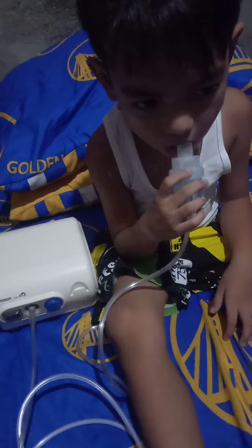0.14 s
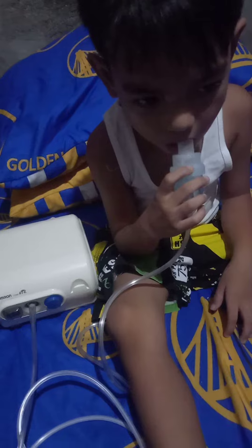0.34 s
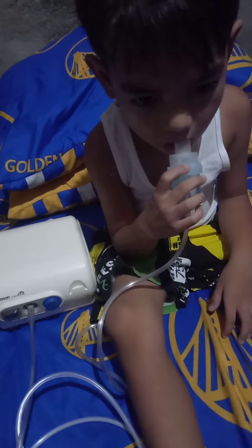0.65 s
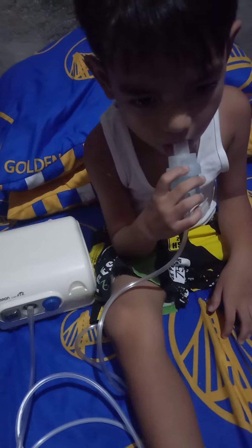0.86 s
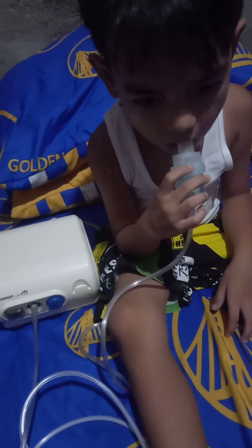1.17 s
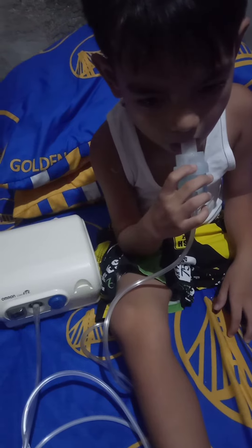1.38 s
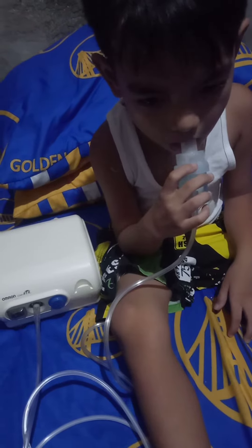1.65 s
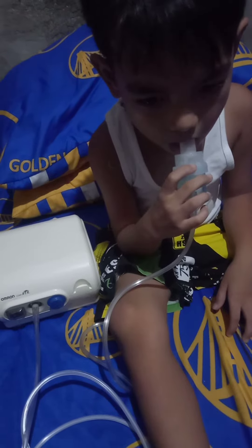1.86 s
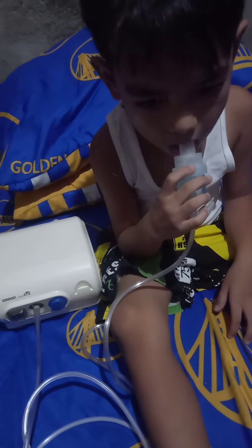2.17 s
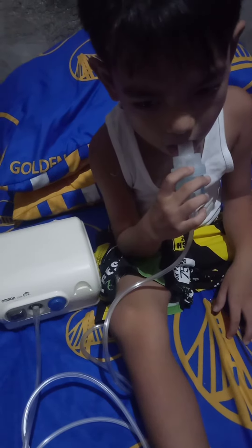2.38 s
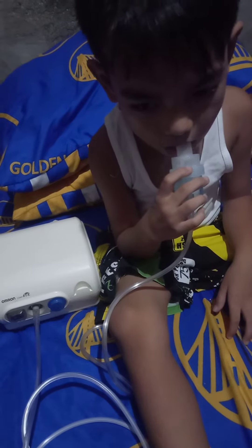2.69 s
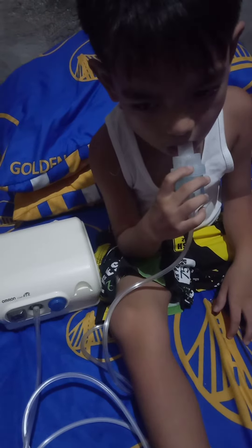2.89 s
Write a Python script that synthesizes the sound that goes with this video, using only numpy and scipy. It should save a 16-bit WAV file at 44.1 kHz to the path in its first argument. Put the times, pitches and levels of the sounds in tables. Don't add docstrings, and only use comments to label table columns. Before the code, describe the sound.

Steady buzzing drone of a little nebulizer pump with fast valve ticking and constant airy hiss.

```python
import sys
import numpy as np
from scipy import signal
from scipy.fft import rfft, irfft, next_fast_len
from scipy.io import wavfile
from scipy.ndimage import map_coordinates

SR = 44100
rng = np.random.default_rng(int(sys.argv[2]) if len(sys.argv) > 2 else 0)


def to_wav(sig):
    pcm = np.clip(np.atleast_2d(sig), -1, 1) * 32767
    pcm = np.round(pcm).astype(np.int16)
    wavfile.write(sys.argv[1], SR, pcm.T)


def level_to_linear(level):
    exponent = np.asarray(level, float) / 20
    return 10 ** exponent


N = 133623
TIME_S = np.arange(N) / SR
SHAFT_HZ = 55.477


def unit(x):
    return x / np.sqrt(np.mean(x ** 2) + 1e-20)


def wobble(rate_hz):
    step = np.arange(0, N + 64, 64)
    knots = rng.standard_normal(int(N * rate_hz / SR) + 5)
    curve = map_coordinates(knots, [step * rate_hz / SR])
    return np.interp(np.arange(N), step, curve)


def filtered(x, response):
    m = next_fast_len(N + 8192)
    spectrum = rfft(x, m) * response(np.fft.rfftfreq(m, 1 / SR))
    return irfft(spectrum, m)[..., :N]


def peak(f, hz, width_hz):
    damping = 1j * f * width_hz
    return damping / (hz * hz - f * f + damping)


def sides(pan_db):
    return level_to_linear(np.array([[pan_db / 2], [-pan_db / 2]]))


def lag(f, seconds, hz, lead_rad):
    half_phase = np.pi * (f - hz) * seconds + lead_rad / 2
    return np.exp(1j * half_phase * np.array([[1], [-1]]))


def pair(alike):
    a, b = rng.standard_normal((2, N))
    u = np.arccos(np.clip(alike, -1, 1)) / 2
    return np.array([np.cos(u) * a + np.sin(u) * b, np.cos(u) * a - np.sin(u) * b])


STROKE_S, SWAY_TURNS = 0.00402, 0.0013


def shaft_angle():
    return SHAFT_HZ * (TIME_S - STROKE_S) + SWAY_TURNS * wobble(12)


# (order [per turn], level [dB], left-right difference [dB])
ORDERS = [(1, -46, 2), (2, -43.5, 2), (3, -53, -7), (4, -35, -1.6), (5, -48, -5), (6, -58, -6.5),
          (7, -50, -7.5), (8, -57.5, -8), (9, -47.5, 5.5), (10, -71, -7), (11, -70, -28), (12, -58.5, 16),
          (13, -46, 0), (14, -65.5, -17), (15, -55, 14), (17, -83, -5), (18, -83, -4), (19, -62.5, -12.5),
          (20, -69.5, -9)]
CRANK_ORDERS = (1, 2, 7, 12, 15)
CRANK_LEAD_TURNS = 0.065
ORDER_UNSTEADY_DB = 0.32


def drone(angle):
    total = np.zeros((2, N))
    for order, db, pan_db in ORDERS:
        lead = CRANK_LEAD_TURNS * (order in CRANK_ORDERS)
        level = level_to_linear(db + ORDER_UNSTEADY_DB * wobble(6.62)) * sides(pan_db)
        total -= level * np.cos(2 * np.pi * order * (angle + lead))
    return np.sqrt(2) * total


def mains_hum():
    hum_hz, crest_s = 120.07, 0.0001
    wave = np.cos(2 * np.pi * hum_hz * (TIME_S - crest_s))
    return np.sqrt(2) * level_to_linear(-42.5) * sides(-2.5) * wave


# (frequency [Hz], width [Hz], level [dB])
VALVE_MODES = [(2080, 335, 2.5), (2375, 160, 2.5), (2970, 340, 8), (3170, 170, 6)]
TICK_S, TICK_JITTER_S = 0.0134, 0.00001
TICK_DB, TICK_SCATTER_DB = -48, 0.5


def valve():
    turn = np.arange(int(N / SR * SHAFT_HZ))
    chance = rng.standard_normal((len(turn), 2))
    hit_s = TICK_S + turn / SHAFT_HZ + TICK_JITTER_S * chance[:, 0]
    at = np.round(hit_s * SR).astype(int)
    hits = np.bincount(at, level_to_linear(TICK_SCATTER_DB * chance[:, 1]), N)[:N]

    def ring(f):
        modes = sum((-1) ** i * level_to_linear(db) * peak(f, hz, width_hz)
                    for i, (hz, width_hz, db) in enumerate(VALVE_MODES))
        return modes * lag(f, 0.00034, 2960, 0.41)

    return level_to_linear(TICK_DB) * unit(filtered(hits, ring))


# (time [s], tilt [1 = full])
CUP_TILT = [
    (.1, 0.),
    (1., 0.),
    (1.78, 0.),
    (1.87, 1),
    (2.1, .9),
    (2.22, -.2),
    (2.6, -.2),
    (3., -.2),
]


def cup_tilt(time_s):
    return np.interp(time_s, *np.transpose(CUP_TILT))


def resonant_noise(modes, angle, alike, lag_s, slow_db, fast_db):
    out = np.zeros((2, N))
    tilt = cup_tilt(TIME_S)
    for hz, width_hz, db, pan_db, pulsing, lead_rad, tilt_db in modes:
        def response(f):
            return peak(f, hz, 1.71 * width_hz) ** 2 * lag(f, lag_s, hz, lead_rad)

        band = unit(filtered(pair(alike), response))
        beat = np.sqrt(1 + np.clip(pulsing, -1, 1) * np.cos(2 * np.pi * angle))
        level_db = db + tilt_db * tilt + slow_db * wobble(3.52) + fast_db * wobble(24.87)
        out += level_to_linear(level_db) * sides(pan_db) * beat * band
    return out


# (frequency [Hz], width [Hz], level [dB], left-right difference [dB],
# pulsing [share of power], left lead [rad], change with tilt [dB])
CASE_MODES = [(55.5, 13, -63, 11, .1, .01, 6), (90.7, 6.7, -61, 8, 0.033, .2, -2),
              (140, 5.8, -58.5, -10.5, 0, .01, 9.5), (227.5, 38, -54, 7, 0.33, .1, 3),
              (327.5, 52, -53.5, 6.5, 0.25, .8, 3.5), (462.5, 38, -52, -7, 0.17, 1.3, -1.5),
              (559, 50, -56, 4, 0.29, 1.9, 0.5), (754, 34, -50.5, 10.5, 0.18, 0.55, -0.5),
              (850, 116, -57.5, 0, .2, .01, -1), (1055, 200, -57.5, -12.5, 0.24, 3, -0.5),
              (1450, 74, -65, 0, .2, 0.79, 8)]


def case_rattle(angle):
    return resonant_noise(CASE_MODES, angle, alike=0.83, lag_s=0.00027, slow_db=0.3, fast_db=-1.1)


# (frequency [Hz], width [Hz], level [dB], left-right difference [dB],
# pulsing [share of power], left lead [rad], change with tilt [dB])
CUP_MODES = [(2450, 380, -53, 2, -0.84, 2.27, -1), (3010, 400, -44.5, -6.5, -0.69, 1.62, 1.5),
             (3660, 245, -45, 3.5, 1, -1.1, 0.5), (3890, 180, -45, 10, 0.97, -8.5, -1),
             (4824, 138, -48, -1, 0.32, -1.43, -0.5), (6072, 440, -48.5, 0.5, -0.11, 1.8, 5.5),
             (6540, 490, -40.5, 3.5, -.25, 0.87, -2.5), (7840, 95, -58.5, -7.5, 0.97, -1.5, 8),
             (8390, 130, -56, -6.5, 0.82, -2.85, 6), (9230, 360, -62, -11, 0.18, .1, 10.5),
             (4520, 130, -58.5, -11, -0.1, -.2, -3), (9887, 520, -48.5, -10, 0.21, -1.7, -3),
             (11890, 420, -47, 3, 0.5, 1.2, 0.5), (13140, 210, -43, 0, 0.29, 2.4, 0.),
             (13800, 450, -47.5, 13.5, .2, 1.5, 0.), (14650, 240, -38.5, 2.5, .25, 1.5, -3),
             (15400, 700, -41.5, 0, .2, 2, 3)]


def cup_jet(angle):
    return resonant_noise(CUP_MODES, angle - 0.56, alike=0.98, lag_s=0.00036, slow_db=0.3, fast_db=0.24)


# (frequency [Hz], density [dB per Hz])
SPRAY_SPECTRUM = [(40, -34), (150, -9), (900, 3), (1600, -9.5), (5000, -5.5), (9000, -1.5), (12500, -17),
                  (15500, -7)]


def spray():
    hz, db = np.transpose(SPRAY_SPECTRUM)

    def response(f):
        return level_to_linear(np.interp(np.log(f + 1), np.log(hz), db))

    return level_to_linear(-41) * unit(filtered(pair(0.36), response))


# (frequency [Hz], width [Hz], depth [dB])
GAPS_IN_JET = [(3510, 70, 6), (3990, 160, 10), (4290, 230, 17), (5130, 150, 5), (5500, 300, 16),
               (6170, 90, 7), (7400, 450, 14), (8000, 200, 7), (8800, 330, 13), (9550, 200, 8),
               (10850, 350, 11), (12400, 550, 4), (13550, 200, 4)]
GAP_DRIFT, GAP_FLICKER = 0.01, 0.72
SHADE_HZ, SHADE_WIDTH_HZ, SHADE_DB = 6600, 700, 7


def cancelled(x):
    f, t, z = signal.stft(x, SR, nperseg=1024)
    f = f[:, None]
    at = np.minimum((t * SR).astype(int), N - 1)
    shade = np.exp(-(2 * (f - SHADE_HZ) / SHADE_WIDTH_HZ) ** 2)
    cut_db = SHADE_DB * cup_tilt(t) * shade
    for hz, width_hz, db in GAPS_IN_JET:
        depth_db = db * np.clip(1 + GAP_FLICKER * wobble(13)[at], 0, 3)
        centre_hz = hz * (1 + GAP_DRIFT * wobble(4.9)[at])
        cut_db = cut_db + depth_db * np.exp(-(2 * (f - centre_hz) / width_hz) ** 2)
    return signal.istft(z * level_to_linear(-cut_db), SR, nperseg=1024)[1][:, :N]


ROOM_DB, ROOM_T60_S = -9.5, 0.092


def room(x):
    t = np.arange(SR // 8) / SR
    tail = rng.standard_normal((2, len(t))) * level_to_linear(-60 * t / ROOM_T60_S) * (t > 0.002)
    tail = tail / np.linalg.norm(tail[0])
    return x + level_to_linear(ROOM_DB) * signal.fftconvolve(x, tail, axes=1)[:, :N]


def scene():
    angle = shaft_angle()
    motor = drone(angle) + mains_hum() + case_rattle(angle) + valve()
    jet = room(cancelled(cup_jet(angle) + spray()))
    return motor + level_to_linear(0.28 * wobble(4.27)) * jet


def roll_off(x):
    return signal.sosfilt(signal.butter(12, 16300, fs=SR, output="sos"), x)


# (time [s], level [dB])
RECORDER_GAIN = [
    (0.1, -36),
    (0.76, -36.5),
    (1.25, -34),
    (3.0, -34),
]
START_S, RISE_S, TOP_HZ = 0.0689, 0.00092, 15760


def record(dry):
    s, db = np.transpose(RECORDER_GAIN)
    opening = np.clip((TIME_S - START_S) / RISE_S, 0, 1)
    gain = level_to_linear(np.interp(TIME_S, s, db - db.mean())) * opening
    return roll_off(filtered(dry, lambda f: f < TOP_HZ) * gain)


dry = scene()
out = record(dry)
to_wav(out)
```